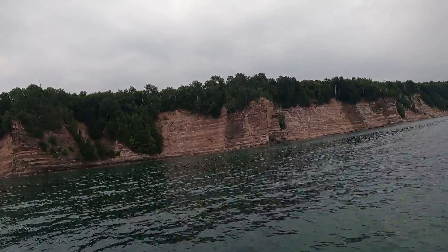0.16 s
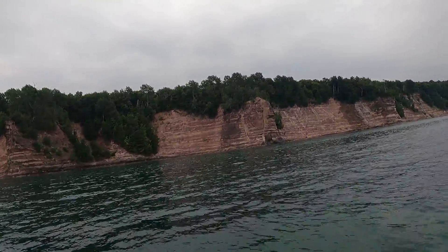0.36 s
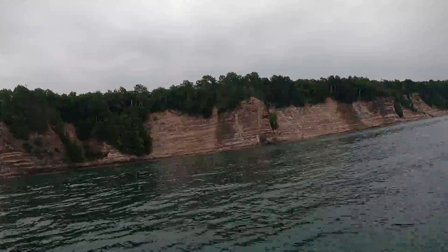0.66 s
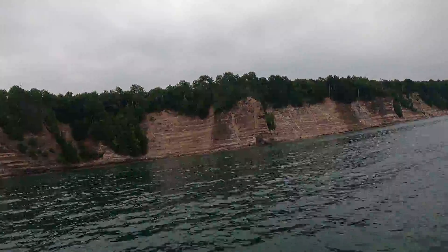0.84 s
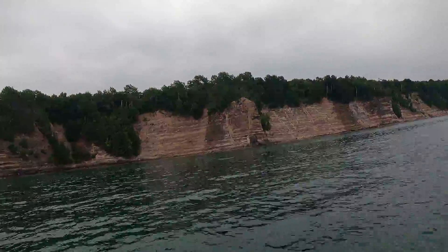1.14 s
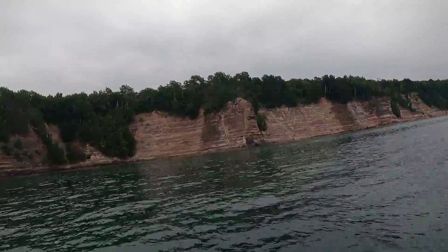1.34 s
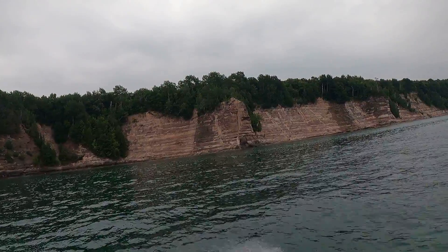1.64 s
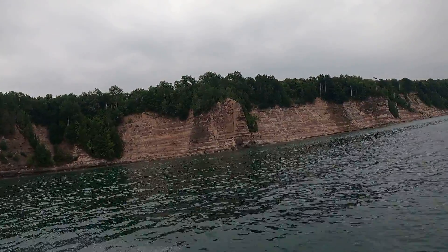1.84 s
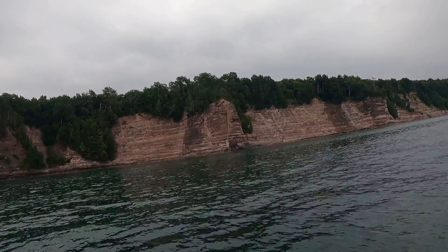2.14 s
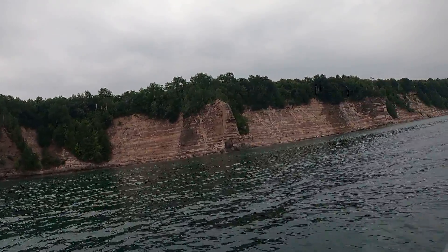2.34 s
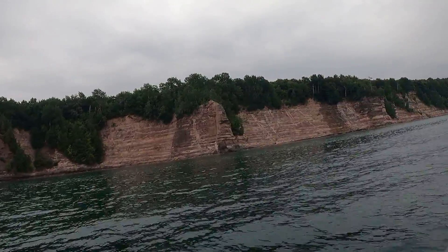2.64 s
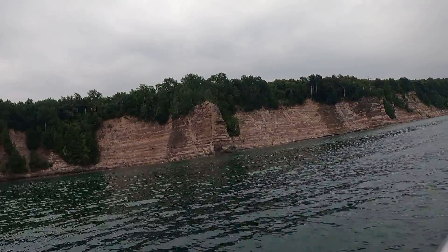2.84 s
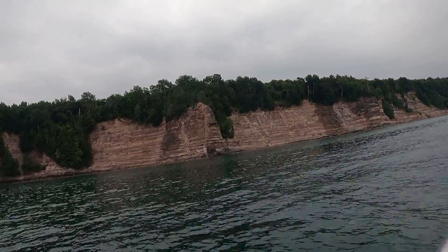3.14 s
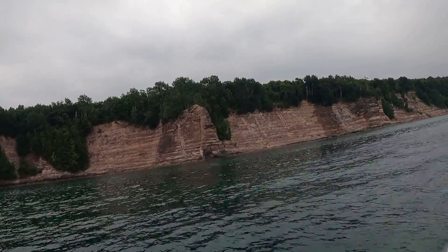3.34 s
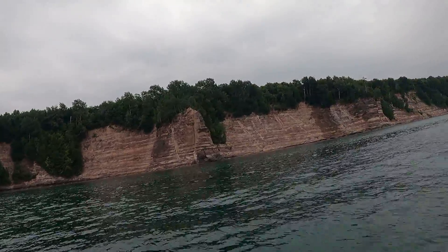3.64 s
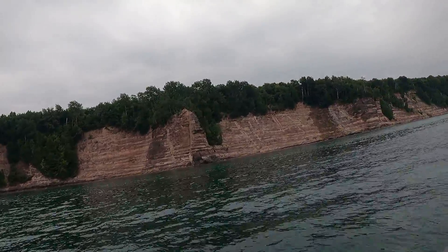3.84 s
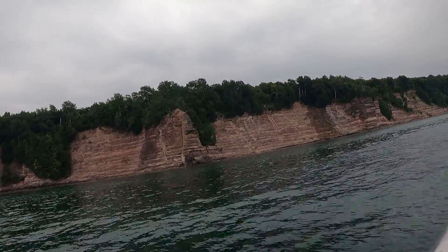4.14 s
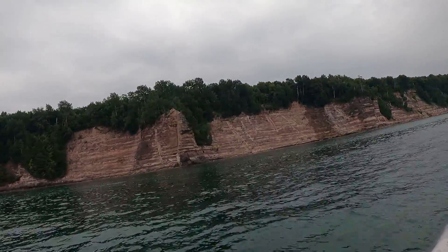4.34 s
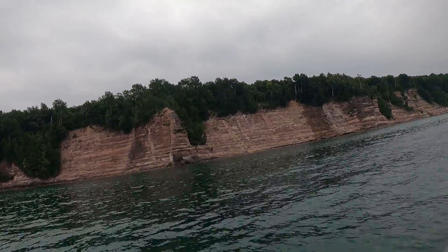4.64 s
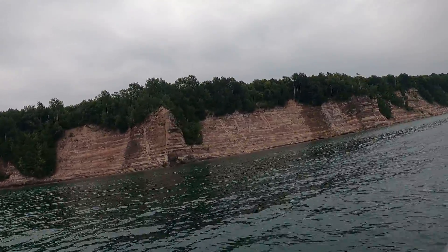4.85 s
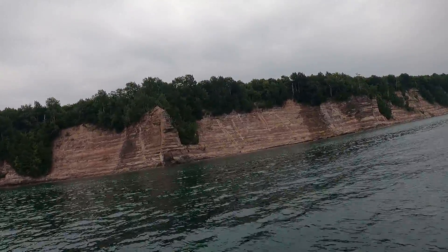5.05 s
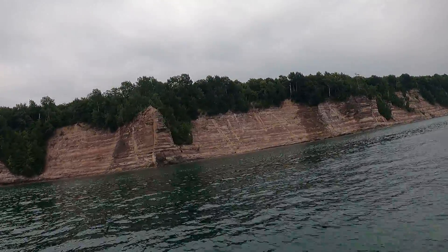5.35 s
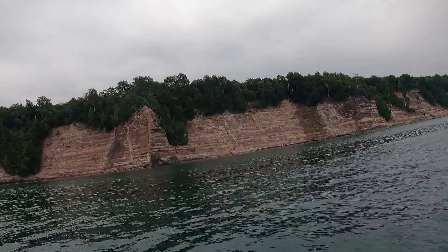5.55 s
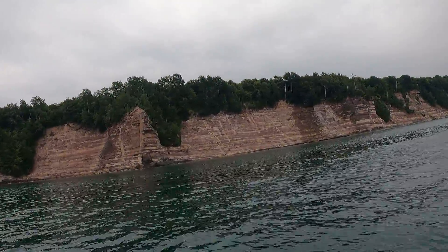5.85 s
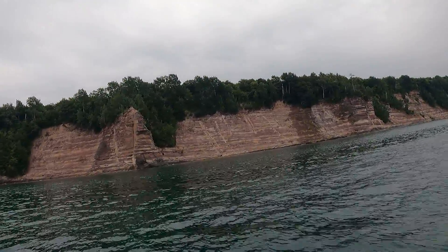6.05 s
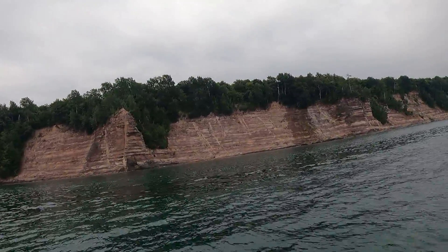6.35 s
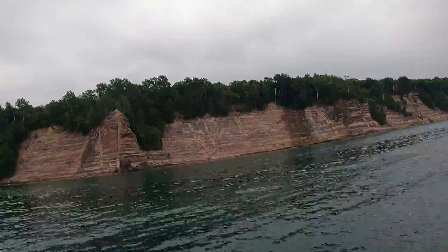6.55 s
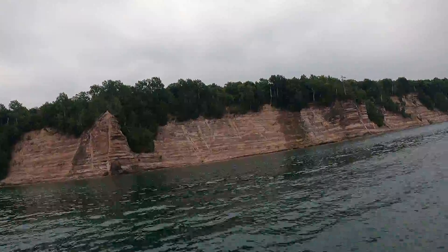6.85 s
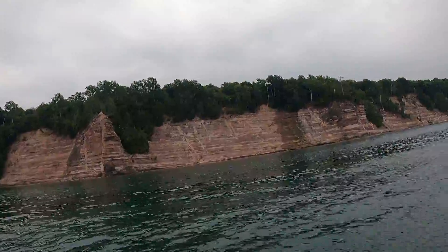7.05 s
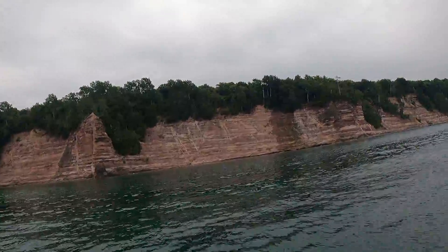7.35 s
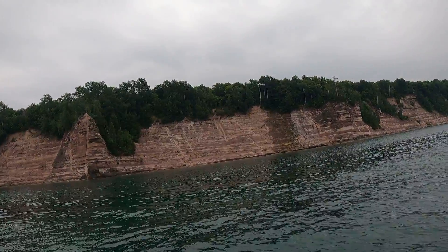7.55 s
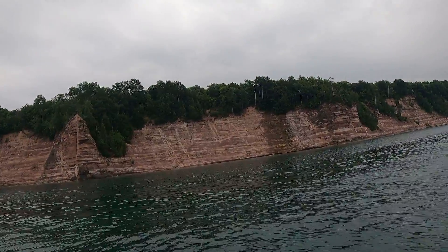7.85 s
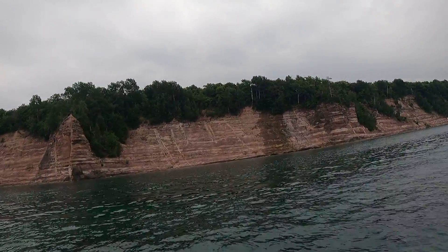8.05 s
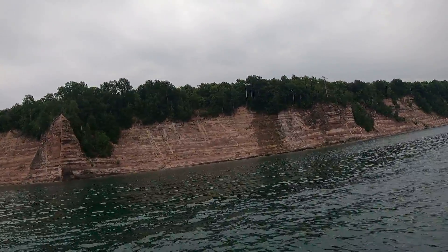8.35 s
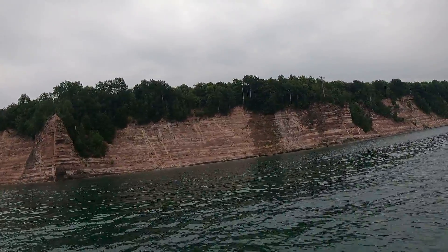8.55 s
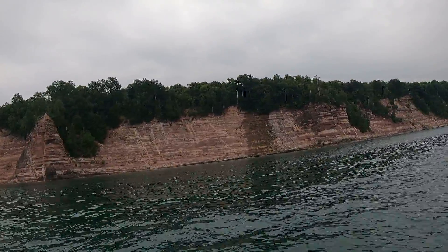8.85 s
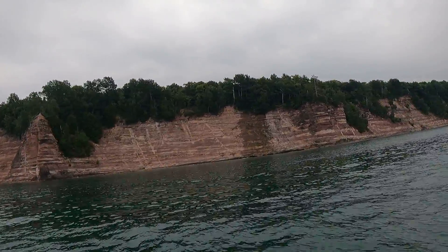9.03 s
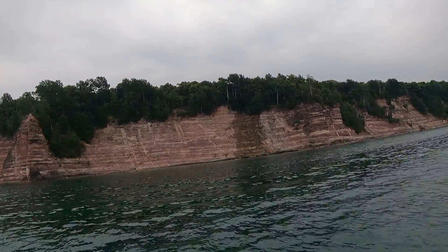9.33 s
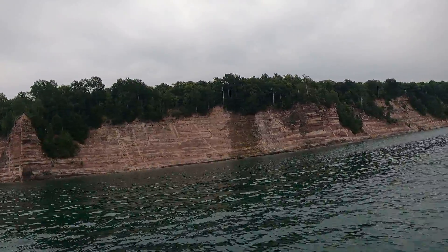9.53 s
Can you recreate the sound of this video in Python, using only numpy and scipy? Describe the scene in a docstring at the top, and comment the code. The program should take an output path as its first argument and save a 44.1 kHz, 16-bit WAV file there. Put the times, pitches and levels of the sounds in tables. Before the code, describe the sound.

A boat cruises steadily: deep beating engine hum, thumping wind rumble, hollow rushing wash with fizzing spray, and a few short wave slaps.

```python
"""On deck off a cliff shore: a twin-engined boat cruises, heard by a camera in a closed case.
The engines drone as harmonic orders of two slightly different shaft speeds and shake the hull panels.
Wind buffets the case as low turbulence noise. The bow wave is filtered noise with ringing bubbles:
it churns, splashes and fizzes, and short noise bursts slap the hull.
The case rings hollowly near 1 kHz and shuts out the top treble."""
import sys
import numpy as np
from scipy import signal
from scipy.fft import rfft, irfft, next_fast_len
from scipy.io import wavfile
from scipy.ndimage import uniform_filter1d

SR = 44100
rng = np.random.default_rng(int(sys.argv[2]) if len(sys.argv) > 2 else 0)


def generate_wav(sig):
    """Save sig (samples, or channels by samples) to the path in sys.argv[1] as 16-bit PCM at SR."""
    pcm = np.round(np.clip(np.atleast_2d(sig).T, -1, 1) * 32767).astype(np.int16)
    wavfile.write(sys.argv[1], SR, pcm)


N = 427329
TIME = np.arange(N) / SR  # s
SIZE = next_fast_len(N, real=True)
FREQ = np.maximum(np.arange(SIZE // 2 + 1) * SR / SIZE, 1)  # Hz, kept above zero for the logarithms

# flow of water along the hull: (time [s], level above the usual [dB])
FLOW = [(0, -3.5), (.26, -0.2), (1.35, -1.1), (1.85, 2.5), (2.95, .6), (3.2, -4.5), (3.75, -1),
        (4.65, -1.6), (5.47, -1.6), (5.75, 3.5), (6.43, 2.5), (6.85, -2.5), (7.6, -1), (7.9, -6),
        (8.9, -0.6), (9.69, 0.7)]


def engine(shaft_hz, orders, drift, waver_db, rattle_db, uneven_db):
    """Harmonic orders and forced resonance: shaft multiples drone, three uneven firings a turn shake panels."""
    # resonances of the hull panels: (frequency [Hz], width [Hz], level [dB])
    hull_panels = [(180, 24, -6.5), (261.5, 30, -1), (329, 34, -2), (358, 19.7, -1), (424, 70, -11.5)]
    # engine load as the boat rides the waves: (time [s], growl of the hull panels before rattle_db [dB])
    load = [(0, -41), (.95, -35.5), (1.8, -36.5), (3.27, -37), (3.47, -46), (4.05, -35.5), (4.95, -37.5),
            (5.6, -35), (6.6, -36.5), (7.15, -43), (7.62, -38), (8.45, -46.5), (9.69, -35)]
    turns = np.cumsum(shaft_hz * (1 + drift * walk(1.5))) / SR
    drone = 0
    for order, db in orders:
        amplitude = np.sqrt(2) * undb(db + waver_db * walk(4))
        drone = drone + amplitude * np.sin(2 * np.pi * (round(order) * turns + rng.random()))
    firing = np.diff(np.floor(3 * turns), prepend=0)
    # each firing is a kick of random strength and sign
    kicks = firing * rng.uniform(-1.06, 1, N)
    rattle = unit(colour(kicks, np.sqrt(resonances(hull_panels))))
    rattle_level_db = curve(load) + rattle_db + uneven_db * walk(6)
    return drone + undb(rattle_level_db) * rattle


def fifth_order_boom():
    """Amplitude modulation of one order: the level [dB] of the fifth order as it booms in the hull."""
    # booms: (start [s], length [s], level above the usual [dB])
    booms = [(-.1, 0.25, 9.5), (1.0, 0.75, 9.5), (4.14, 0.34, 11), (6.3, 0.11, 8), (8.07, .12, 7),
             (9.19, 0.086, 7)]
    usual_db = -42
    return usual_db + swells(booms, attack_s=.1, release_s=.14)


def wind(thump_db, flicker_db, eddy_s):
    """Turbulent pressure: big eddies thump on the case, small ones flutter and differ from port to port."""
    # spectrum of the big eddies: (frequency [Hz], relative density [dB per Hz])
    buffet_spectrum = [(3, -28.5), (9, -14.5), (20, -11), (35, -3.5), (55, 1), (72, 7), (92, 2.5),
                       (108, -5), (125, -11.5), (170, -20.5), (400, -72)]
    # spectrum of the small eddies: (frequency [Hz], relative density [dB per Hz])
    flutter_spectrum = [(70, -27), (130, 2), (200, 2), (290, -3), (350, -5), (410, -10.5), (560, -10),
                        (700, -18.5), (1200, -40.5)]
    # gusts, or lulls where negative: (start [s], length [s], level above the steady wind [dB])
    gusts = [(.18, .5, 2.5), (.92, 0.19, 3.5), (1.31, 0.18, 3.5), (1.95, .52, 1.5), (2.54, .1, -3),
             (2.72, .55, 5), (3.29, .05, -10), (3.87, 0.069, -7), (4.37, .26, 4), (4.87, .1, 3),
             (5.55, 0.42, 4), (5.9, 0.16, -6), (6.18, .11, -4), (6.52, 0.44, 1), (6.98, .29, 5.5),
             (7.31, 0.097, -11), (7.42, .06, 5.5), (7.65, .41, 3.5), (8.16, 0.1, -5.5), (8.41, 0.062, -4),
             (8.59, .38, 3.5), (9.01, 0.19, -5.5)]
    # wind that differs between the ports: (frequency [Hz], gain relative to the shared part [dB])
    wind_apart = [(60, -40.5), (120, -30), (200, -22), (300, -9.5), (500, -17)]
    buffet_db, flutter_db = -20.5, -34  # rms in the steady wind
    flutter_per_flow = .25  # dB per dB: the headwind grows with the flow
    gust_db = swells(gusts, attack_s=.03, release_s=0.028)
    buffet = colour(noise(), spectrum(buffet_spectrum))
    # eddies of even strength, so that the gusts and their turbulence set the level
    buffet /= np.sqrt(smooth(buffet ** 2, int(eddy_s * SR)))
    buffet *= undb(buffet_db + gust_db + thump_db * walk(18))
    flutter_level_db = flutter_db + flutter_per_flow * curve(FLOW) + flicker_db * walk(18)
    flutter = unit(colour(noise(), spectrum(flutter_spectrum))) * undb(flutter_level_db)
    shared, apart = buffet + flutter
    return np.array([shared, colour(apart, undb(along_hz(wind_apart)))])


def water(case, slosh_db, dash_db):
    """Broadband flow noise and bubble resonance: the bow wave churns, its crests splash, fine spray fizzes."""
    # spectra of the three layers: (frequency [Hz], relative density [dB per Hz])
    churn_spectrum = [(200, -30.5), (450, 0), (800, -1), (1300, -1.5), (1700, 0), (2300, -7), (4000, -33)]
    splash_spectrum = [(900, -23), (1500, -5), (2200, -0.5), (3200, -1.5), (4200, -1.5), (5500, -18.5),
                       (8000, -27)]
    spray_spectrum = [(2000, -19), (3500, -3), (4700, -0.5), (7500, -1), (12000, -6.5)]
    # breaking crests of the bow wave: (start [s], length [s], level above the flow [dB])
    crests = [(.45, .27, 1.5), (.96, 0.15, 3.5), (2.09, 0.055, 2.2), (2.32, .06, 2.6), (3.4, 0.15, 4),
              (3.83, 0.17, 5), (4.15, .08, 4), (4.3, 0.1, 5.5), (4.87, 0.15, 4.5), (5.08, 0.25, 3.5),
              (5.99, .13, 2.5), (6.26, 0.13, 2.5), (8.18, 0.067, 3), (8.52, 0.063, 3), (9.06, .31, 3.5)]
    # churning at the hull, a hollow roar: (time [s], rms level between crests [dB])
    roar = [(0, -35), (.3, -32.5), (1.3, -33), (1.6, -31.5), (2.6, -32), (3.3, -34.5), (3.8, -33.5),
            (4.05, -31), (4.42, -31), (4.6, -32.5), (5.6, -32.5), (5.78, -30), (6.58, -29.5), (6.66, -33),
            (8.05, -33), (8.65, -31.5), (9.69, -32)]
    splash_db, spray_db = -37.5, -43  # rms in the usual flow
    churn_per_crest, splash_per_wash, spray_per_wash = 0.19, 1, 0.88  # dB per dB
    crest_db = swells(crests, attack_s=.04, release_s=.07)
    wash_db = curve(FLOW) + crest_db

    churn = noise() + undb(-13) * bubbles(
        per_s=900, low_hz=505, high_hz=1890, cycles=8.9, spread_db=-0.5, count=8)
    splash = noise() + undb(-8.0) * bubbles(
        per_s=2000, low_hz=1595, high_hz=4640, cycles=4.5, spread_db=0.0, count=8)
    spray = noise() + undb(-8.5) * bubbles(
        per_s=2500, low_hz=4100, high_hz=9000, cycles=3.5, spread_db=3.0, count=4)

    churn = unit(colour(churn, spectrum(churn_spectrum) * case))
    churn *= undb(curve(roar) + churn_per_crest * crest_db)
    splash = unit(swirl(colour(splash, spectrum(splash_spectrum) * case), depth_db=1.23))
    splash *= undb(splash_db + splash_per_wash * wash_db)
    spray = unit(colour(spray, spectrum(spray_spectrum) * case))
    spray *= undb(spray_db + spray_per_wash * wash_db)
    # the churn sloshes; the crest falls in uneven dashes that carry splash and spray together
    return churn * undb(slosh_db * walk(14)) + (splash + spray) * undb(dash_db * walk(38))


def bubbles(per_s, low_hz, high_hz, cycles, spread_db, count=12):
    """Damped oscillation: bubbles of many sizes each ring for a few cycles and rise in pitch."""
    out = np.zeros((2, N))
    for hz in np.geomspace(low_hz, high_hz, count):
        ring_samples = SR * cycles / hz
        age = np.arange(int(ring_samples) + 2) / ring_samples
        # the ring decays by 40 dB over its length
        ring = np.exp(-np.log(100) * age) * np.sin(2 * np.pi * cycles * age * (1 + 0.11 * age))
        births = rng.random((2, N)) < per_s / count / SR
        strength = np.minimum(rng.exponential(size=(2, N))[births], 4)
        kicks = np.zeros((2, N))
        kicks[births] = undb(spread_db * strength)
        out += signal.oaconvolve(kicks, ring[None] / np.linalg.norm(ring), axes=1)[:, :N]
    return unit(out)


def swirl(x, depth_db, count=6):
    """Band-wise modulation: bubble clouds of different sizes come and go, so each pitch range swells alone."""
    place = np.interp(np.log(FREQ), np.log([1600, 5000]), [0, count - 1])
    out = 0
    for k in range(count):
        band_gain = np.maximum(1 - abs(place - k), 0)
        out = out + colour(x, band_gain) * undb(depth_db * walk(7))
    return out


def slaps(case, rise_s):
    """Impulsive excitation: now and then a wave hits the hull with a short hollow splat."""
    # waves hitting the hull: (time [s], rms level at the peak before decay [dB], decay [s])
    hits = [(1.482, -29, 0.017), (2.14, -27, .04), (2.597, -23, 0.017), (4.441, -20.5, 0.035),
            (5.31, -24.5, 0.036), (8.037, -33, 0.011), (8.484, -30, 0.024), (8.722, -30, 0.014),
            (9.538, -22.5, 0.0083)]
    force = np.zeros(N)
    for start_s, db, decay_s in hits:
        age = np.maximum(TIME - start_s, 0)
        rise = np.minimum(age / rise_s, 1)
        force += undb(db) * rise * np.exp(-np.maximum(age - rise_s, 0) / decay_s)
    # a blunt push rings mostly the lowest case modes
    thud = np.sqrt(resonances([(1040, 250, 0)]))
    return force * unit(colour(noise(), thud * case))


def case_response():
    """Transmission and resonance: the case rings alike at both ports, and unrelated leaks fill in between."""
    # case resonances: (frequency [Hz], width [Hz], level [dB])
    case_modes = [(781, 93, 5.5), (926, 81, 7), (1027, 58, 14.5), (1122, 93, 16), (1697, 200, 2.5),
                  (2387, 410, 3), (2945, 90, 0.5), (3103, 124, 3.5), (3597, 240, -2), (4170, 64, -1.5),
                  (5240, 410, -5.5), (7060, 390, -6.5)]
    # what the case wall lets through: (frequency [Hz], level [dB])
    wall = [(300, 5), (650, -2.5), (1380, 1), (1930, -12.5), (2700, -9.5), (3300, -11), (4500, -8),
            (6500, -7.5), (7750, -10.5), (8000, -15.5), (9400, -26), (10300, -26), (11500, -33),
            (15000, -37)]
    # water sound reaching each port by its own path: (frequency [Hz], level on the wall's scale [dB])
    leak = [(450, -19.5), (750, -7.5), (1100, -4), (1650, -10.5), (1950, -12), (3100, -7.5), (3500, -13),
            (4200, -12), (5200, -27), (6000, -19), (7800, -26), (9400, -31.5), (10300, -31.5), (15000, -50)]
    shared = np.sqrt(undb(along_hz(wall)) ** 2 + resonances(case_modes))
    return np.array([shared, undb(along_hz(leak))])


def ports(pair):
    """Level and phase differences between receivers: the case favours one port or the other by pitch."""
    # left minus right: (frequency [Hz], level [dB])
    balance = [(100, 0.87), (260, .5), (620, 3.5), (790, 0.5), (1050, 6.5), (1400, 6), (1850, -5),
               (2100, 4), (2700, 0), (3050, 3), (3800, -0.5), (6000, -2), (7500, 0), (10300, 3.5)]
    # left ahead of right: (frequency [Hz], phase [rad])
    lead = [(150, 0), (700, -0.56), (1500, -0.22), (1900, -1.8), (2200, -.25), (3270, -0.8), (3620, -0.15),
            (3960, -1), (4500, 0.26), (8000, 0)]
    shared, apart = pair
    # half of each difference goes to either side
    lean = undb(along_hz(balance) / 2) * np.exp(1j * along_hz(lead) / 2)
    return np.array([colour(shared + apart, lean), colour(shared - apart, 1 / lean)])


def noise():
    """Statistical independence: one noise that the ports share and one in which they differ."""
    return rng.standard_normal((2, N))


def walk(rate):
    """Slow random modulation: levels held for 1 / rate seconds and slewed, rms 1."""
    k = int(SR / rate)
    steps = rng.standard_normal(N)[:N // k + 1]
    return unit(smooth(np.repeat(steps, k)[:N], k))


def resonances(modes):
    """Summed modal power: steep-sided resonance peaks."""
    power = 0
    for hz, width, db in modes:
        power = power + undb(db) ** 2 / (1 + ((FREQ - hz) / width) ** 2 * 2) ** 2
    return power


def spectrum(points):
    """Spectral envelope: gain through (Hz, dB) points, falling 12 dB an octave above the last."""
    return undb(along_hz(points)) * np.minimum(points[-1][0] / FREQ, 1) ** 2


def along_hz(points):
    """Logarithmic pitch scale: join (Hz, value) points on a log-frequency axis."""
    hz, value = np.transpose(points)
    return np.interp(np.log(FREQ), np.log(hz), value)


def colour(x, gain):
    """Linear filtering: multiply the Fourier spectrum by a gain per frequency."""
    return irfft(rfft(x, SIZE) * gain, SIZE)[..., :N]


def swells(events, attack_s, release_s):
    """Trapezoid envelopes: summed level in dB of events that rise, hold and fall back."""
    level_db = 0
    for start_s, length_s, db in events:
        rise = (TIME - start_s) / attack_s
        fall = 1 + (start_s + length_s - TIME) / release_s
        level_db = level_db + db * np.clip(np.minimum(rise, fall), 0, 1)
    return level_db


def curve(table):
    """Linear interpolation: join (s, value) points, one value a sample."""
    return np.interp(TIME, *np.transpose(table))


def smooth(x, k):
    """Moving average, taken twice over k samples."""
    return uniform_filter1d(uniform_filter1d(x, k), k)


def unit(x):
    """Power normalisation: scale to rms 1; a pair goes by its shared part."""
    return x / np.sqrt(np.mean(np.atleast_2d(x)[0] ** 2))


def undb(db):
    """Logarithmic level: decibels to amplitude gain."""
    return 10 ** (np.asarray(db) / 20)


def scene():
    """Superposition: wind, water and both engines add up at the two microphone ports."""
    # lines of the faster and of the slower engine: (multiple of the shaft speed, rms level [dB])
    fast_orders = [(1, -31), (2, -28), (3, -35.5), (10, -54)]
    slow_orders = [(3, -31), (5, -50), (7, -57), (12, -55)]
    fast_hz, slow_hz = 35.23, 32.59  # shaft speeds before drift
    case = case_response()
    pair = wind(thump_db=1.5, flicker_db=1.77, eddy_s=0.048)
    pair += water(case, slosh_db=0.73, dash_db=0.68)
    pair += slaps(case, rise_s=.003)
    fifth = [(5, fifth_order_boom())]
    # the engines come through the hull, alike at both ports
    pair[0] += engine(fast_hz, fast_orders + fifth,
                      drift=.005, waver_db=2.16, rattle_db=-2.0, uneven_db=1.2)
    pair[0] += engine(slow_hz, slow_orders,
                      drift=.002, waver_db=-0.8, rattle_db=-4.5, uneven_db=-0.1)
    return ports(pair)


def record(dry):
    """Band limitation: a 4 ms fade-in and the camera's steep treble cut at 15.7 kHz."""
    fade = np.minimum(TIME / .004, 1)
    treble_cut = signal.ellip(8, .2, 70, 15700, fs=SR, output="sos")
    return signal.sosfilt(treble_cut, dry * fade)


dry = scene()
out = record(dry)
generate_wav(out)
```